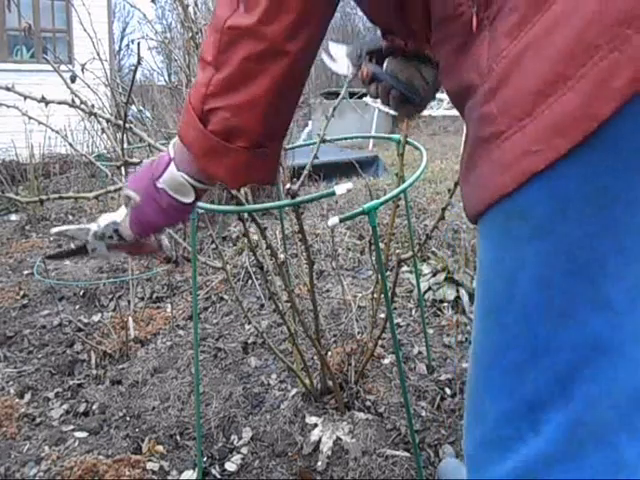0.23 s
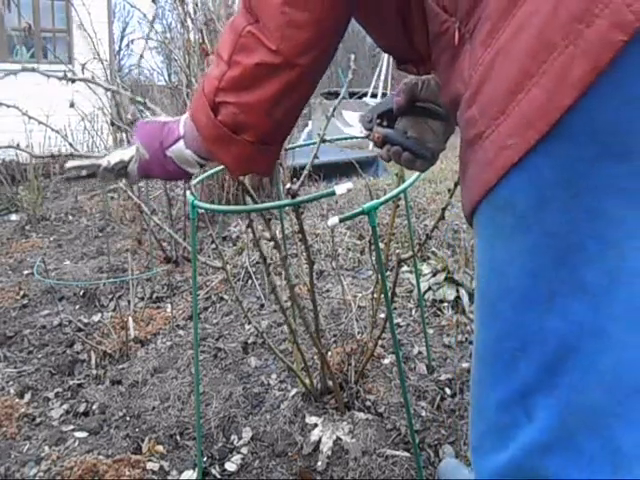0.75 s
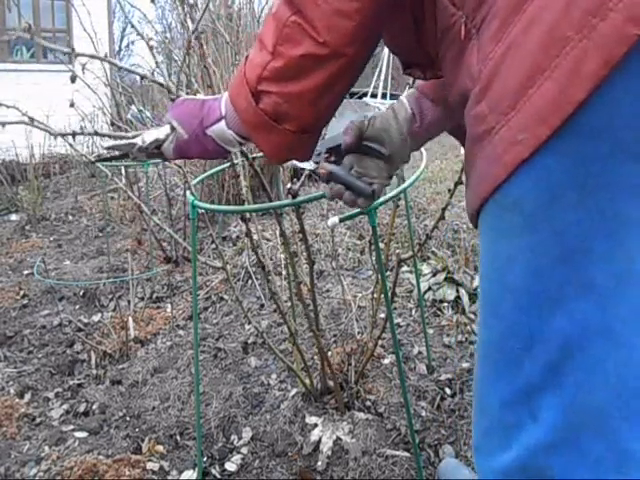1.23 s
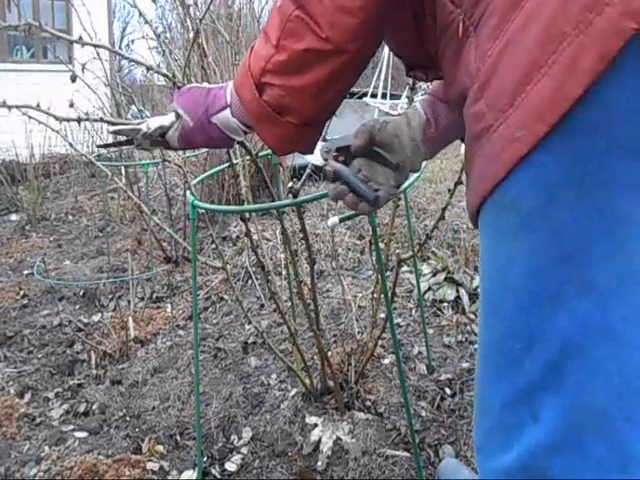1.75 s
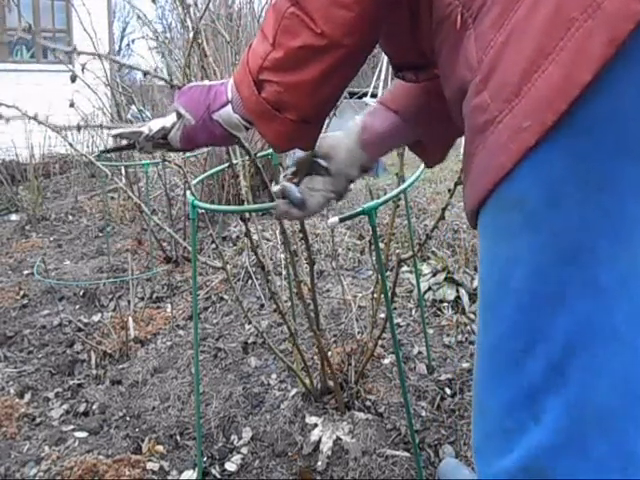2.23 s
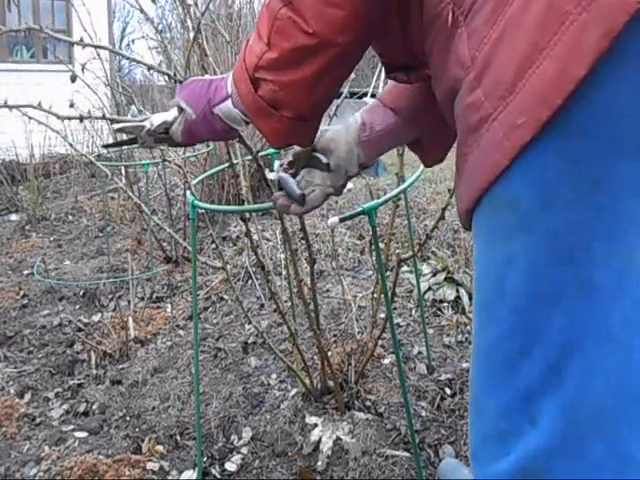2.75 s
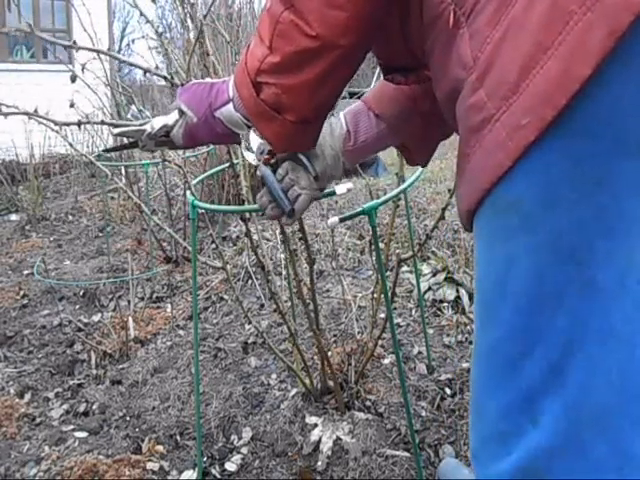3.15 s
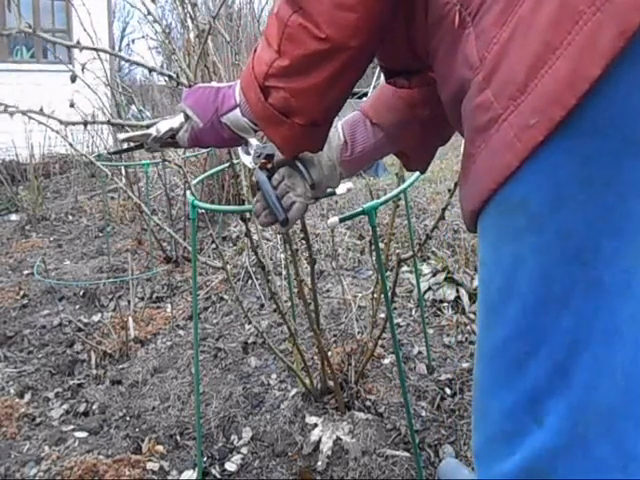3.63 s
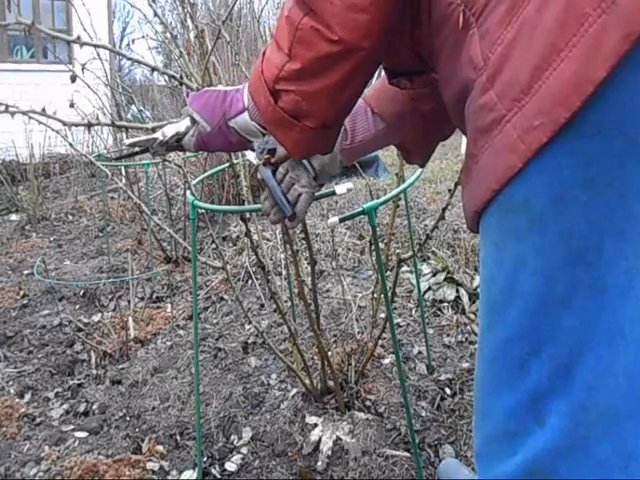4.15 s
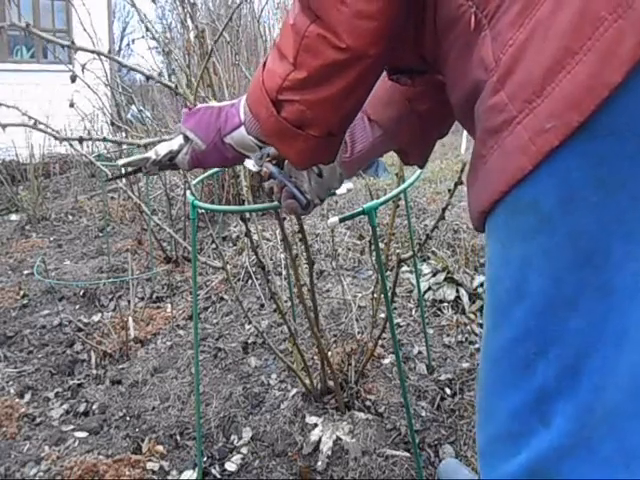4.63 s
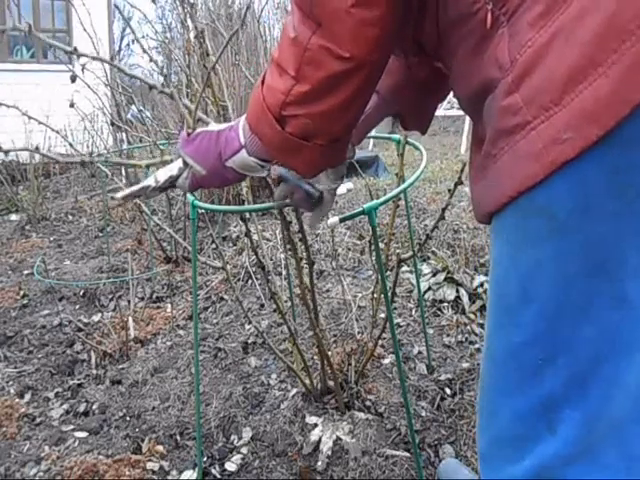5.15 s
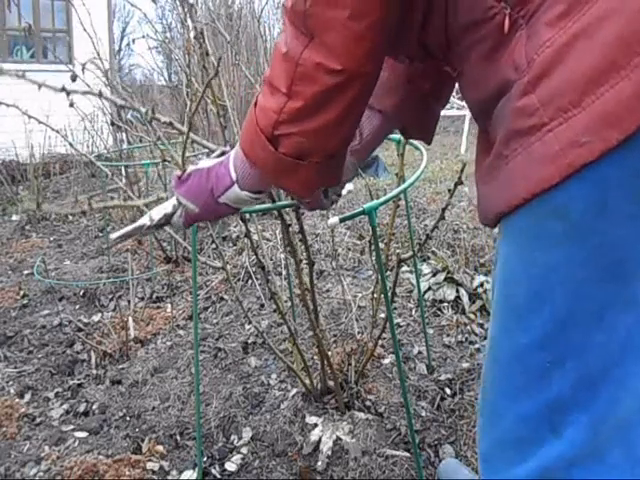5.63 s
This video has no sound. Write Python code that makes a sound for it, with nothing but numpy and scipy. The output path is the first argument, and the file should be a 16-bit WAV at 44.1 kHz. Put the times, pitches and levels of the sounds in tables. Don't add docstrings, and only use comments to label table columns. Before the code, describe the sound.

Gloved hands work pruning shears in a bare shrub, with metallic knocks, dry twig rustle, a sharp stem snap, and small birds twittering nearby.

```python
import sys
import numpy as np
from scipy import signal
from scipy.fft import rfft, irfft, next_fast_len
from scipy.io import wavfile
from scipy.ndimage import map_coordinates

SR = 44100
rng = np.random.default_rng(int(sys.argv[2]) if len(sys.argv) > 2 else 0)


def gain_from_db(level_db):
    decades = np.asarray(level_db, float) / 20
    return 10 ** decades


def persist_wave(psi):
    counts = np.round(np.clip(psi, -1, 1) * 32767).astype(np.int16)
    wavfile.write(sys.argv[1], SR, np.atleast_2d(counts).T)


N = 259659

# start in seconds, peak in dB, thud in dB, crack in dB.
BLADE_KNOCKS = [
    (1.0758, -15.5, -13.5, 2),
    (1.2415, -10.5, -16, -2.5),
    (1.345, -26.5, -36, 4),
]
# frequency in Hz, level in dB, t60 in seconds.
STEEL_MODES = [(1600, 9, 0.035), (2100, 3, 0.018), (2860, -4, 0.01), (3440, -8, .012), (3820, 6, .028),
               (4600, 10, 0.0085)]
# frequency in Hz, level in dB, t60 in seconds.
THUD_MODES = [(486, -1.5, 0.11), (725, -3, 0.06), (1060, 0, .05), (1240, -2, 0.036)]
# start in seconds, peak in dB, pitch in Hz, t60 in seconds, sign of the push.
STEM_SNAPS = [
    (.0463, -14, 2000, .0022, -1),
    (.0851, -5.5, 2100, .0022, -1),
    (5.6137, -1, 1850, .004, -1),
    (5.6156, -8, 1950, .009, 1),
]
FIBRE_DB, FIBRE_DB_PER_DOUBLING, CLEAN_T60_S = -7.5, 5, 0.002
# start in seconds, peak in dB, centre in Hz.
TWIG_TICKS = [(0.411, -43, 2600), (0.6589, -29, 2120), (0.689, -30, 3220), (1.1055, -25.5, 1600),
              (1.1765, -27.5, 3780), (1.289, -36, 3500), (1.712, -38, 3650), (2.335, -47, 1800),
              (3.225, -37, 900), (3.247, -34, 3490), (3.258, -33, 2120), (4.3191, -40.5, 3220),
              (4.3947, -33, 4110), (4.5653, -35, 4000), (4.6595, -36, 3580), (4.6815, -34, 3950),
              (5.1536, -34.5, 2720), (5.3052, -25.5, 3000), (5.5824, -35, 1920), (5.6244, -41, 1660),
              (5.7064, -33, 4520), (5.752, -34, 5000)]
# start in seconds, peak in dB, centre in Hz.
CANE_SCRAPES = [(0.62, -30, 4070), (0.899, -24.5, 4100), (1.092, -25, 3140), (1.124, -29.5, 1870),
                (4.3859, -31, 3660), (4.3898, -27.5, 4620), (4.775, -35, 4500), (4.884, -35, 2860),
                (5.419, -29.5, 2330), (5.4765, -24.5, 1720), (5.5762, -24, 3840), (5.6593, -22, 2420),
                (5.726, -28, 4300), (5.7347, -29.5, 4130)]
TICK_T60_S, TICK_Q, SCRAPE_T60_S, SCRAPE_Q = 0.02, 1.74, 0.03, 0.57
# middle in seconds, length in seconds, centre in Hz,
# width in Hz, level in dB.
SLEEVE_BRUSHES = [(.03, 0.1, 4520, 3020, -33.5), (0.304, 0.21, 2100, 910, -39.5),
                  (0.639, 0.043, 3500, 1500, -43), (0.695, 0.049, 3340, 1500, -43),
                  (0.962, .08, 3280, 1500, -47), (2.44, 0.088, 3520, 2500, -55.5),
                  (2.608, 0.097, 5570, 3000, -51.5), (3.249, 0.08, 6760, 2000, -56),
                  (3.25, 0.07, 1000, 900, -53.5), (3.775, .05, 3570, 500, -55),
                  (4.476, 0.11, 2360, 900, -51.5), (4.477, 0.12, 6000, 2500, -51.5),
                  (4.827, 0.15, 2100, 900, -52), (5.395, 0.18, 2100, 1500, -46),
                  (5.588, 0.028, 4500, 4000, -39), (5.534, .05, 3600, 1490, -48)]
# time in seconds, level in dB.
HAND_EFFORT = [(0, -35.5), (.38, -40), (.55, -46), (1.0, -45), (1.5, -48.5), (1.7, -53.5), (2.13, -54.5),
               (2.4, -49.5), (2.79, -56.5), (3.03, -56), (3.25, -52.5), (4.3, -61), (4.52, -48),
               (4.64, -54), (4.8, -49), (5.2, -50), (5.55, -44.5), (5.89, -52)]
# time in seconds, dryness in dB.
DRYNESS = [
    (0, 1),
    (.6, 1),
    (1.35, -1.5),
    (2.05, 0.5),
    (2.62, 1),
    (2.85, -0.5),
    (4.2, 1),
    (4.42, 0.5),
    (5.89, 4.5),
]
# frequency in Hz, density in dB per Hz.
CLOTH_SPECTRUM = [(120, -20), (250, -11.5), (500, -1.5), (900, 0), (1500, -2.5), (2500, -15.5), (5000, -62)]
TWIG_SPECTRUM = [(600, -43), (1200, -9.5), (1700, -3), (2100, -1), (2700, -2.5), (3500, -3.5), (4800, -6),
                 (6500, -15), (9000, -34)]
FIZZ_SPECTRUM = [(2500, -15), (4500, 4), (6500, 9), (8000, 5.5), (9200, 0), (10200, -7.5), (11000, 8.5)]
USUAL_EFFORT_DB = -48
FIZZ_DB, FIZZ_GROWTH = -50.5, 1.31
SLEEVE_DB, SLEEVE_GROWTH = -55.5, 1

# start in seconds, length in seconds, start in Hz, end in Hz,
# level in dB.
HOOK_WHISTLES = [
    (.012, .071, 7570, 6500, -39),
    (.175, .112, 7520, 5950, -38),
    (.355, .123, 7170, 6000, -37),
]
BOW_WHISTLES = [
    (3.075, .071, 7330, 6050, -48),
    (3.124, .074, 7380, 6050, -39),
    (5.668, .038, 7600, 6200, -49),
]
SLIDE_WHISTLES = [
    (2.655, .062, 8400, 7480, -53),
    (2.745, .055, 7420, 6600, -53),
    (2.712, .048, 8450, 7550, -53),
    (2.752, .097, 7780, 6550, -46),
    (2.862, .036, 8030, 7600, -50),
    (2.91, .127, 8100, 6650, -43),
    (2.92, .066, 7700, 6840, -54),
    (5.745, .097, 7800, 6750, -51),
    (5.787, .106, 7900, 6750, -48),
]
HOOK_TAIL_S, BOW_TAIL_S, HOOK_SWELL_DB = .0115, .022, 14
SLIDE_TAIL_S, SLIDE_TAIL_SHARE, SLIDE_SWELL_DB = .006, .15, 10
ATTACK_S, RELEASE_S, WAVER_HZ = 0.0045, 0.0058, 35
# start in seconds, length in seconds, start in Hz, end in Hz, level in dB.
STRAIGHT_CHIPS = [(.453, .02, 8100, 8450, -55), (.688, .024, 7000, 8400, -60),
                  (.722, .022, 9400, 8100, -61), (.732, .012, 5400, 7200, -57),
                  (.744, .018, 7300, 8700, -55), (.782, .016, 9300, 7600, -57),
                  (2.005, .03, 9800, 7500, -66), (2.062, .022, 9800, 7000, -64),
                  (3.06, .018, 3400, 4000, -59), (3.278, .016, 3500, 4100, -57),
                  (3.755, .06, 3800, 2900, -68), (3.472, .016, 3400, 3900, -65),
                  (2.085, .03, 4300, 3800, -65), (.95, .03, 3800, 3900, -57), (4.21, .06, 4250, 4200, -72),
                  (3.21, .04, 6650, 6600, -57), (2.625, .03, 6400, 6550, -65),
                  (.208, .012, 7000, 7300, -47), (.765, .16, 2150, 2030, -55),
                  (2.848, .018, 7700, 8000, -67), (5.49, .19, 7530, 7330, -57),
                  (.85, .028, 3850, 3900, -57)]
# middle in seconds, length in seconds, top in Hz, level in dB,
# upper voice in dB.
TWITTER_ARCHES = [(0.863, .035, 6000, -56, -12), (1.033, 0.03, 6000, -52, 0), (1.145, 0.034, 6050, -48, 1),
                  (2.14, 0.032, 6260, -55, -4), (2.187, 0.043, 6180, -51, 1), (2.237, 0.035, 5950, -52, -6),
                  (2.286, 0.036, 5970, -51, 3), (2.315, .03, 5880, -52, -8), (2.366, 0.041, 5900, -48, 0),
                  (2.41, 0.034, 5740, -51, -8), (2.459, 0.046, 5850, -46, -2), (4.997, .03, 9450, -64, -30),
                  (5.047, .028, 9400, -63, -30), (5.137, 0.034, 5800, -56, -4),
                  (5.215, 0.036, 5850, -50, 3), (5.255, 0.024, 5700, -50, -16),
                  (5.304, .036, 5580, -47, -5)]
LOWER_VOICE_DB = -4.5
# start in seconds, length in seconds, strokes per second,
# high pitch in Hz, level in dB.
TRILL_RUNS = [
    (2.497, 0.042, 87, 4820, -44),
    (2.693, 0.04, 89, 5300, -45.5),
    (2.877, 0.067, 115, 5340, -46.5),
    (3.077, 0.062, 110, 5480, -39),
    (3.294, 0.036, 95, 5440, -37.5),
    (3.488, 0.042, 110, 5400, -41.5),
]
TRILL_LOW_HZ, DIP = 4300, .45
HUSKY_START_S, HUSKY_HOLD_S, HUSKY_ATTACK_S = 3.63, 0.2, 0.009
HUSKY_HZ, HUSKY_SAG_HZ, SAG_AT_S, SAG_OVER_S = 5180, 250, .095, .035
HUSKY_DB, FADE_DB_PER_S, DIES_DB, DIES_S = -50, 44, 15, .07
SIDE_OFFSET_HZ, SIDE_DB, SIDE_GAIN_DB = 290, -12, 12

# frequency in Hz, t60 in seconds.
GARDEN_DECAY = [(300, .12), (2000, 0.079), (5000, 0.35), (10000, 0.13)]
# time in seconds, level in dB.
ROAD_SWELL = [
    (0.0, -53.5),
    (0.82, -55.5),
    (1.28, -52.5),
    (1.92, -60),
    (3.05, -61),
    (3.41, -58),
    (4.13, -64),
    (5.56, -56),
    (5.89, -61),
]
# frequency in Hz, density in dB per Hz.
HUM_SPECTRUM = [(15, -48), (30, -8), (55, -6.5), (72, 2.5), (90, -6), (200, -4.5), (300, -2), (600, -6.5),
                (900, -42)]
ROAD_BODY_DB, HUM_DB = 2, -4
# frequency in Hz, gain in dB.
CAMERA_FILTER = [(20, 2.5), (10200, 2), (10500, -12.5), (10700, -28), (11025, -66)]
TOP_HZ = 16000


def unit(x):
    return x / np.sqrt(np.mean(x ** 2) + 1e-20)


def peak(x):
    return x / abs(x).max()


def along(points, hz):
    f, v = np.transpose(points)
    return np.interp(np.log(hz + 1), np.log(f + 1), v)


def wobble(rate_hz):
    knots = rng.standard_normal(int(N * rate_hz / SR) + 4)
    return map_coordinates(knots, [np.arange(N) * rate_hz / SR])


def coloured(x, spectrum):
    m = next_fast_len(N + 8192)
    gain = gain_from_db(along(spectrum, np.fft.rfftfreq(m, 1 / SR)))
    return irfft(rfft(x, m) * gain, m)[:N]


def resonate(x, hz, q):
    return signal.lfilter(*signal.iirpeak(hz, q, SR), x)


def sine(hz):
    return np.sqrt(2) * np.sin(2 * np.pi * np.cumsum(hz) / SR)


def add(track, s, x):
    part = track[round(s * SR):][:len(x)]
    part += x[:len(part)]


def ring(modes, t):
    out = np.zeros(len(t))
    for hz, db, t60 in modes:
        out += gain_from_db(db + rng.normal(0, 0.95) - 60 * t / t60) * np.sin(2 * np.pi * hz * t)
    return out


def knocks():
    out, t = np.zeros(N), np.arange(SR // 8) / SR
    crack_filter = signal.butter(2, [1300, 6800], "band", fs=SR)
    for s, db, thud_db, crack_db in BLADE_KNOCKS:
        rattle = gain_from_db(-60 * t / .022) * rng.standard_normal(len(t))
        push = gain_from_db(-60 * t / .06) * rng.standard_normal(len(t))
        blow = 0.15 * rattle + (t == 0)
        steel = signal.fftconvolve(blow, ring(STEEL_MODES, t))[:len(t)]
        thud = signal.fftconvolve(push, ring(THUD_MODES, t))[:len(t)]
        crack = signal.lfilter(*crack_filter, rattle)
        knock = gain_from_db(-1.5) * peak(steel) + gain_from_db(thud_db) * peak(thud) + gain_from_db(crack_db) * peak(crack)
        add(out, s, gain_from_db(db) * knock)
    return out


def snaps():
    out, t = np.zeros(N), np.arange(SR // 30) / SR
    for s, db, hz, t60, sign in STEM_SNAPS:
        push = sign * np.sin(2 * np.pi * hz * t)
        fibres = resonate(rng.standard_normal(len(t)), 4800, .8)
        fibre_db = FIBRE_DB + FIBRE_DB_PER_DOUBLING * np.log2(t60 / CLEAN_T60_S)
        envelope = gain_from_db(-60 * t / t60) * (1 - np.exp(-t * 20 / t60)) ** 2
        add(out, s, gain_from_db(db) * peak(envelope * (push + gain_from_db(fibre_db) * fibres)))
    return out


def contacts(rows, t60, q):
    out, t = np.zeros(N), np.arange(SR // 15) / SR
    envelope = gain_from_db(-60 * t / t60) * (1 - np.exp(-t / 0.00038))
    for s, db, hz in rows:
        burst = rng.standard_normal(len(t)) * envelope
        tone = resonate(resonate(burst, hz, q), hz, q / 2)
        add(out, s, gain_from_db(db) * peak(tone))
    return out


def ticks():
    return contacts(TWIG_TICKS, TICK_T60_S, TICK_Q) + contacts(CANE_SCRAPES, SCRAPE_T60_S, SCRAPE_Q)


def brushes():
    out = np.zeros(N)
    for s, length, hz, width_hz, db in SLEEVE_BRUSHES:
        noise, grain = rng.standard_normal((2, round(length * SR)))
        q = hz / width_hz
        band = resonate(resonate(noise * gain_from_db(6.7 * grain), hz, q), hz, q)
        add(out, max(s - length / 2, 0), gain_from_db(db) * unit(band) * np.hanning(len(band)))
    return out


def falling(notes, tail_s, tail_share, swell_db):
    out, waver_hz = np.zeros(N + SR), WAVER_HZ * np.tile(wobble(45), 2)
    for s, length, start_hz, end_hz, db in notes:
        t = np.arange(0, length, 1 / SR)
        fallen = (1 - tail_share) * t / length + tail_share * np.exp((t - length) / tail_s)
        ends = np.clip(np.minimum(t / ATTACK_S, (length - t) / RELEASE_S), 0, 1)
        pitch = start_hz + (end_hz - start_hz) * fallen + waver_hz[round(s * SR):][:len(t)]
        add(out, s, ends * gain_from_db(db + swell_db * (t / length - 1)) * sine(pitch))
    return out[:N]


def whistles():
    out = falling(HOOK_WHISTLES, HOOK_TAIL_S, 1, HOOK_SWELL_DB)
    out += falling(BOW_WHISTLES, BOW_TAIL_S, .9, HOOK_SWELL_DB)
    out += falling(SLIDE_WHISTLES, SLIDE_TAIL_S, SLIDE_TAIL_SHARE, SLIDE_SWELL_DB)
    for s, length, start_hz, end_hz, db in STRAIGHT_CHIPS:
        u = np.linspace(0, 1, round(length * SR))
        envelope = abs(np.sin(np.pi * u)) ** 0.46
        add(out, s, gain_from_db(db + 5.3) * envelope * sine(start_hz + (end_hz - start_hz) * u))
    return out


def twitters():
    out = np.zeros(N)
    for s, length, top_hz, db, upper_db in TWITTER_ARCHES:
        u = np.linspace(-1, 1, round(length * SR))
        bend_hz = 38000 * length * abs(u - .04) ** 2.5
        main = (1 - u ** 4) ** 0.7 * sine(top_hz - bend_hz)
        short = np.clip(1 - (u / .8) ** 2, 0, 1) ** .8
        upper = gain_from_db(upper_db) * short * sine(top_hz + 830 - 1.1 * bend_hz)
        lower = gain_from_db(LOWER_VOICE_DB) * short ** 3 * sine(.655 * top_hz - 0.37 * bend_hz)
        add(out, s - length / 2, gain_from_db(db) * (main + upper + lower))
    return out


def trills():
    out = np.zeros(N)
    for s, length, rate_hz, high_hz, db in TRILL_RUNS:
        t = np.arange(0, length, 1 / SR)
        count = t * rate_hz
        stroke = count % 1
        reach = np.where(count < 1, .42, 1.1 - 0.442 * t / length)
        size = np.sin(np.pi * stroke) ** 1.1 * gain_from_db(-3 * t / length + 0.84 * (count < 1))
        size *= 1 - DIP * np.exp(-((stroke - .5) / .12) ** 2) * (count > 1)
        sweep_hz = (high_hz - TRILL_LOW_HZ) * reach * (1 - 0.99 * stroke)
        add(out, s, gain_from_db(db) * size * sine(TRILL_LOW_HZ + 150 * t / length + sweep_hz))
    return out * gain_from_db(1.7 * wobble(140))


def husky_whistle():
    t = np.arange(N) / SR - HUSKY_START_S
    sagged = (1 + np.tanh((t - SAG_AT_S) / SAG_OVER_S)) / 2
    pitch = HUSKY_HZ - HUSKY_SAG_HZ * sagged + 55 * wobble(140)
    over_db = DIES_DB * (1 - np.exp(-np.maximum(t - HUSKY_HOLD_S, 0) / DIES_S))
    size = np.clip(t / HUSKY_ATTACK_S, 0, 1) * gain_from_db(HUSKY_DB - FADE_DB_PER_S * abs(t) - over_db)
    side_db = SIDE_DB + SIDE_GAIN_DB * sagged - over_db + 2.5 * wobble(110)
    side = gain_from_db(side_db) * sine(pitch + SIDE_OFFSET_HZ)
    return size * (gain_from_db(1.6 * wobble(110)) * sine(pitch) + side)


def garden(x):
    hz, t, z = signal.stft(rng.standard_normal(SR // 2), SR, nperseg=256)
    decay = gain_from_db(-60 * t / along(GARDEN_DECAY, hz)[:, None])
    tail = signal.istft(z * decay, SR, nperseg=256)[1]
    return signal.fftconvolve(np.pad(x, (300, 0)), tail / np.linalg.norm(tail))[:N]


def rustle(spectrum, grains, spread_db, share):
    chance, size = rng.random((2, N))
    hits = (chance < grains / SR) * gain_from_db(spread_db * size) * np.sign(rng.standard_normal(N))
    mix = np.sqrt(share) * unit(hits) + np.sqrt(1 - share) * rng.standard_normal(N)
    return unit(coloured(mix, spectrum))


def background():
    t = np.arange(N) / SR
    road_db, effort_db, dry_db = [np.interp(t, *np.transpose(c)) for c in (ROAD_SWELL, HAND_EFFORT, DRYNESS)]
    extra_db = effort_db - USUAL_EFFORT_DB
    stir = wobble(22.07)
    body = np.hypot(gain_from_db(road_db + ROAD_BODY_DB), gain_from_db(SLEEVE_DB + SLEEVE_GROWTH * extra_db))
    cloth = body * gain_from_db(0.27 * stir) * rustle(CLOTH_SPECTRUM, grains=1500, spread_db=22, share=0.23)
    twig_gain = gain_from_db(effort_db + 0.59 * stir + 0.92 * wobble(60))
    twigs = twig_gain * rustle(TWIG_SPECTRUM, grains=1200, spread_db=14, share=0.24)
    fizz_gain = gain_from_db(FIZZ_DB + dry_db + FIZZ_GROWTH * extra_db + 0.4 * stir + 1.6 * wobble(60))
    fizz = fizz_gain * rustle(FIZZ_SPECTRUM, grains=1500, spread_db=0, share=0.3)
    hum_gain = gain_from_db(road_db + HUM_DB + 0.81 * wobble(8.3))
    hum = hum_gain * rustle(HUM_SPECTRUM, grains=100, spread_db=9, share=0.0099)
    return cloth + twigs + fizz + hum


def scene():
    near = signal.lfilter(*signal.butter(2, 8000, fs=SR), knocks()) + snaps() + ticks() + brushes()
    near = signal.sosfilt(signal.butter(4, [300, 8000], "band", fs=SR, output="sos"), near)
    flutter = gain_from_db(2.7 * wobble(150))
    close = whistles() * flutter * gain_from_db(2.3 * wobble(40))
    arches = twitters() * gain_from_db(2.2 * wobble(300))
    far = trills() + husky_whistle()
    thin = np.roll(resonate(far, 4930, 9), round(.016 * SR))
    echo = garden(gain_from_db(-41) * near + gain_from_db(-10.5) * close + gain_from_db(-9) * arches + gain_from_db(-1) * thin)
    return (near + close + arches + far + echo + background())[None]


def band_limit(x):
    return signal.sosfilt(signal.butter(12, 17060, fs=SR, output="sos"), x)


def record(dry):
    held = np.repeat(coloured(dry[0], CAMERA_FILTER)[1::2], 2)
    held = np.pad(held, (1, 0))[:N]
    mix = coloured(held, [(TOP_HZ, 0), (TOP_HZ + 80, -200)])
    return band_limit(mix[None])


dry = scene()
out = record(dry)
persist_wave(out)
```